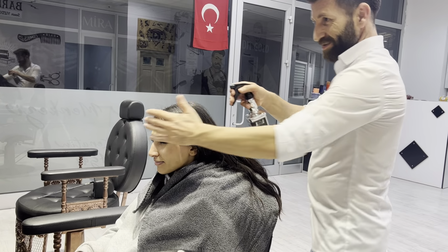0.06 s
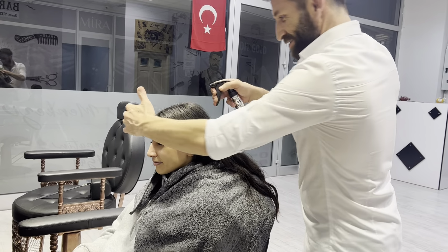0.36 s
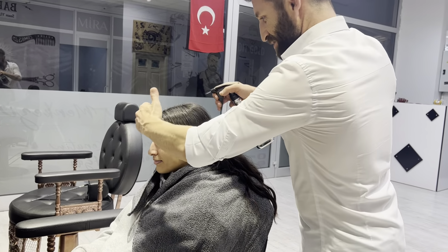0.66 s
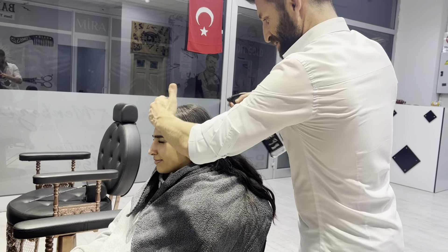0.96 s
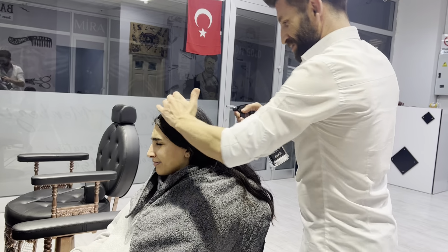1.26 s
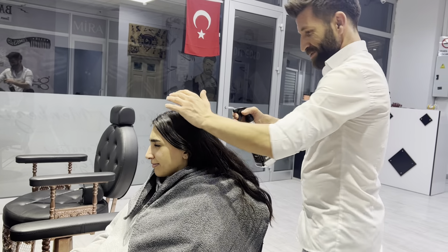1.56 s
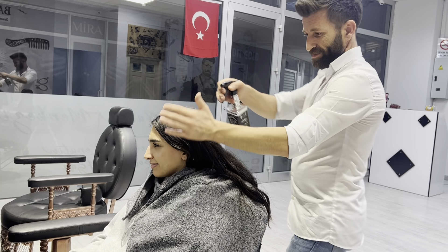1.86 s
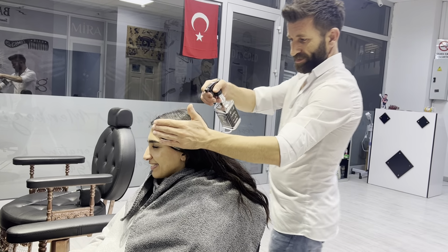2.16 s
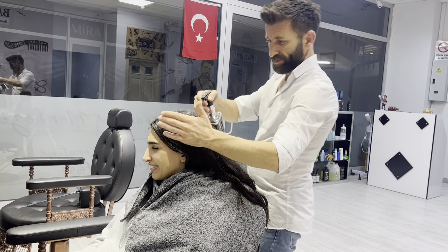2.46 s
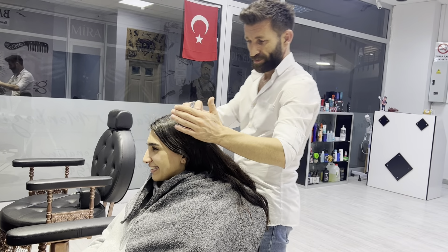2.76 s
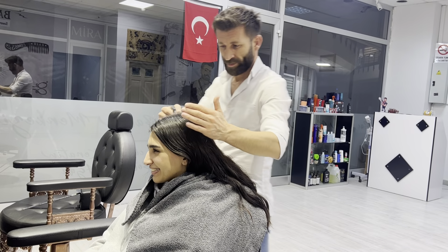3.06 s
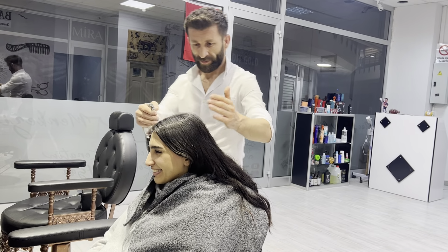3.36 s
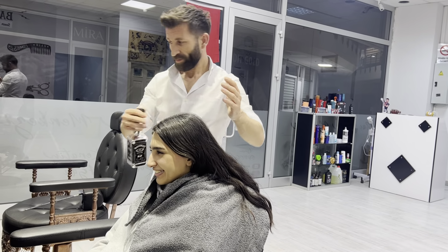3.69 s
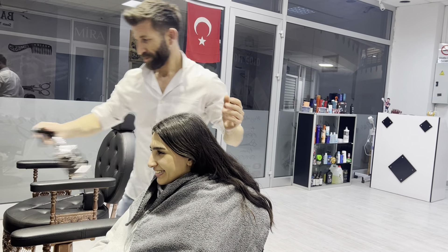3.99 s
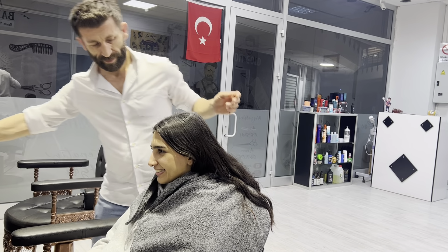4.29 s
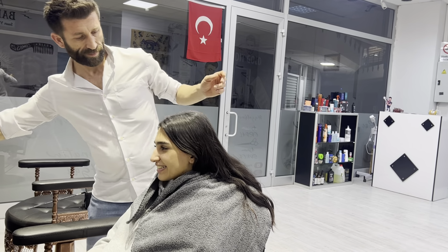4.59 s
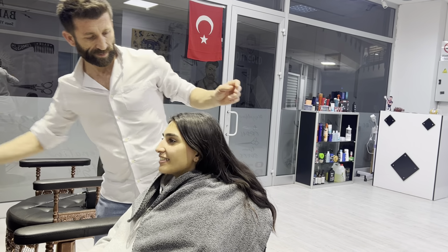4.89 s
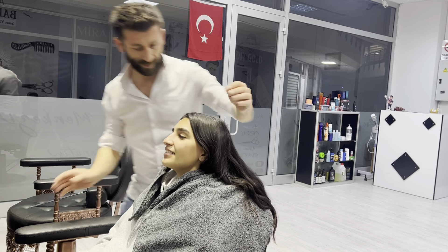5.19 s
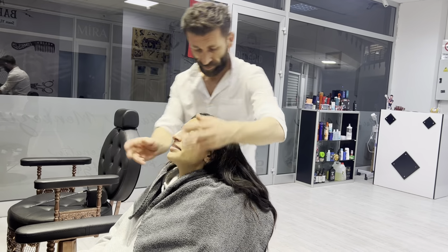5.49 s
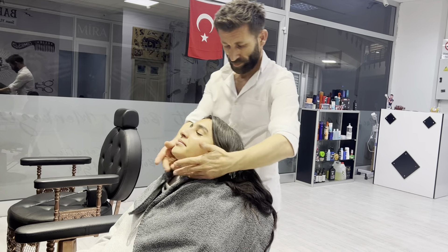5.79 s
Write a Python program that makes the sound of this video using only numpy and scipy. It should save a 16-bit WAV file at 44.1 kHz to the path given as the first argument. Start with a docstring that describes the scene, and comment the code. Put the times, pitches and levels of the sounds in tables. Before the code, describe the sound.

In a quiet, tiled barber's salon with a low hum, a trigger spray bottle is squeezed about a dozen times, each stroke a small plastic click and a faint hiss of mist. Twice, air spits more sharply from the nozzle. Clothes rustle and shoes tap softly nearby. Then the bottle lands on a hollow counter with one loud thump that booms briefly in the room.

```python
"""A trigger spray bottle mists hair in a tiled, humming barber's salon.
Stroke by stroke the plastic pump clacks and the jet hisses; twice air spits sharply through the nozzle.
Clothes rustle and shoes tap on the floor. Then one loud thump: the bottle lands on a hollow counter,
whose low modes boom on in the room."""
import sys
import numpy as np
from scipy import signal
from scipy.fft import rfft, irfft, next_fast_len
from scipy.io import wavfile
from scipy.ndimage import map_coordinates

SR = 44100
rng = np.random.default_rng(int(sys.argv[2]) if len(sys.argv) > 2 else 0)


def waveform_to_disk(signal):
    """Save audio, clipped to [-1, 1], as 16-bit WAV at the path in sys.argv[1]."""
    frames = np.transpose(np.atleast_2d(signal))
    scaled = np.clip(frames, -1, 1) * 32767
    samples = np.round(scaled).astype(np.int16)
    wavfile.write(sys.argv[1], SR, samples)


N = 257499
T = np.arange(SR) / SR  # 1 s event clock
SCENE_T = np.arange(N) / SR
SIDES = np.array([[0.5], [-0.5]])  # left, right share of a level or time offset

# trigger strokes: (time [s], nominal jet length [s], mist [dB], tick [dB], knock [dB])
SQUEEZES = [(.39, .18, -71.5, -79, -83), (0.632, 0.21, -71, -54, -63.5), (0.878, 0.21, -65.5, -54, -62.5),
            (1.127, 0.38, -69, -52, -58.5), (1.392, .14, -55, -72, -67), (2.06, 0.16, -66.5, -78, -72.5),
            (2.268, 0.19, -64.5, -50, -59.5), (2.495, 0.13, -63, -49.5, -57), (2.675, .11, -61, -49, -55.5),
            (2.843, 0.099, -62.5, -52.5, -55), (2.996, 0.052, -68.5, -55, -58.5),
            (3.148, 0.059, -63, -51, -58), (3.475, 0.081, -64.5, -52, -59)]


def amp(db):
    """Decibels to gain."""
    return 10 ** (np.asarray(db) / 20)


def along(points, hz):
    """Interpolate (frequency [Hz], value) points on a log axis."""
    knots_hz, values = np.transpose(points)
    return np.interp(np.log(hz + 1), np.log(knots_hz + 1), values)


def fade(t60_s, attack_s):
    """Exponential rise and decay, 1 s long."""
    return np.exp(-np.log(1000) * T / t60_s) * (1 - np.exp(-T / attack_s))


def burst(t60_s, attack_s):
    """White noise that rises and decays."""
    return rng.standard_normal(SR) * fade(t60_s, attack_s)


def arch(t, length):
    """Half sine: 0 to 1 and back within the length."""
    return np.abs(np.sin(np.pi * np.clip(t / length, 0, 1)))


def swells(rows):
    """Scene-long gain, one arch per (start [s], length [s], level [dB])."""
    return sum(amp(db) * arch(SCENE_T - start_s, length_s) for start_s, length_s, db in rows)


def wobble(rate_hz):
    """Smooth scene-long curve through random knots."""
    knots = rng.standard_normal(int(N * rate_hz / SR) + 4)
    return map_coordinates(knots, [np.arange(N) * rate_hz / SR])


def add(track, start_s, x):
    """Mix x into the track."""
    span = track[..., round(start_s * SR):][..., :x.shape[-1]]
    span += x[..., :span.shape[-1]]


def filtered(x, response):
    """Apply a complex response(hz)."""
    n = x.shape[-1]
    size = next_fast_len(n + SR // 4)
    return irfft(rfft(x, size) * response(np.fft.rfftfreq(size, 1 / SR)), size)[..., :n]


def coloured(x, spectrum, size=4096):
    """Minimum-phase filter of unit energy with the given spectrum."""
    gain = amp(along(spectrum, np.fft.rfftfreq(size, 1 / SR)))
    cepstrum = irfft(np.log(gain))
    cepstrum[1:size // 2] *= 2
    cepstrum[size // 2 + 1:] = 0
    kernel = irfft(np.exp(rfft(cepstrum)))
    return signal.fftconvolve(x, kernel / np.linalg.norm(kernel))[:len(x)]


def resonant(x, modes):
    """Resonator bank of unit power: (centre [Hz], width [Hz], gain [dB])."""
    def response(hz):
        bank = sum((-1) ** k * amp(db) * 1j * hz * width / (centre ** 2 - hz ** 2 + 1j * hz * width)
                   for k, (centre, width, db) in enumerate(modes))
        return bank / np.sqrt(np.mean(np.abs(bank) ** 2))
    return filtered(x, response)


def diffuse(pair):
    """Two independent signals to a sound field: alike in the bass, loose in the treble."""
    # left-right likeness: (frequency [Hz], correlation [-])
    likeness = [(50, 0.89), (130, 0.82), (260, 0.87), (520, 0.54), (1000, 0.41), (2000, 0.34),
                (12000, 0.093)]

    def weights(hz):
        angle = np.arccos(np.clip(along(likeness, hz), -1, 1)) / 2
        return np.array([np.cos(angle), np.sin(angle)])
    mid, side = filtered(pair, weights)
    return np.array([mid + side, mid - side])


def field(spectrum):
    """Diffuse stereo noise of rms 1 with the given spectrum."""
    noise = diffuse(filtered(rng.standard_normal((2, N)), lambda hz: amp(along(spectrum, hz))))
    return noise / np.sqrt(np.mean(noise ** 2) + 1e-20)


def in_salon(x, wet_db, left_db, lead_ms=0.021):
    """Place an event, left channel leading, with reverberation off tiles and glass."""
    # room decay: (frequency [Hz], t60 [s])
    decay = [(80, 0.71), (250, 0.6), (700, 0.42), (2000, 0.42), (4000, 0.54), (8000, 0.42), (15000, 0.097)]
    hz, t, bands = signal.stft(rng.standard_normal((2, SR * 3 // 4)), SR, nperseg=256)
    bands *= np.exp(-np.log(1000) * t / along(decay, hz)[:, None])
    tail = signal.istft(bands, SR, nperseg=256)[1]
    onset = 1 - np.exp(-T[:tail.shape[1]] / 0.00094)
    tail = diffuse(tail * onset)
    reverb = signal.fftconvolve(x[None], tail / np.linalg.norm(tail[0]), axes=1)[:, :SR]
    direct = filtered(x, lambda hz: np.exp(2j * np.pi * hz * SIDES * lead_ms / 1000))
    return (direct + amp(wet_db) * reverb) * amp(SIDES * left_db)


def background(hum_hz=100, hum_db=-62, sink_from_s=5.3, sink_db_per_s=17, hiss_rest_db=-99):
    """Room air, wavering mains hum, and two faint narrow bands of recorder hiss that swell twice."""
    # room air spectrum: (frequency [Hz], gain [dB])
    air_spectrum = [(18, -57), (30, -19), (45, 0.5), (60, -1.5), (80, -9.5), (110, 2), (140, -17.5),
                    (280, -20), (560, -31.5), (1100, -38), (1900, -35), (3400, -44), (8200, -40),
                    (11000, -43.5), (16000, -45.5)]
    # narrow bands of hiss: (centre [Hz], width [Hz], gain [dB])
    hiss_bands = [(2090, 290, -3), (4760, 450, 0.5)]
    # their swells: (start [s], length [s], level [dB])
    hiss_swells = [(1.66, 0.35, -81.5), (4.78, 0.41, -90.5)]
    sink_db = sink_db_per_s * np.maximum(SCENE_T - sink_from_s, 0)
    hum_gain = amp(hum_db - sink_db + 1.8 * wobble(5))
    hum = hum_gain * np.sin(2 * np.pi * hum_hz * SCENE_T + 0.39 * wobble(11))
    air = amp(-65 + 0.4 * wobble(3.32)) * field(air_spectrum)
    hiss_gain = amp(hiss_rest_db) + swells(hiss_swells)
    hiss = hiss_gain * resonant(rng.standard_normal((2, N)), hiss_bands)
    return (hum + air + hiss) * amp(SIDES)


def clothes(rest_db=-84):
    """With each movement cloth crumples in uneven dull patches and the sleeves swish."""
    # arm and body movements: (start [s], length [s], rustle [dB], swish [dB])
    moves = [(0.0, 0.34, -77.5, -79.5), (1.228, 0.47, -70, -90), (2.097, 1.0, -76, -97),
             (3.434, .34, -64.5, -79), (4.0, 0.21, -75.5, -91), (4.187, 0.071, -82, -72),
             (5.204, 0.15, -74.5, -77)]
    # crumpling cloth spectrum: (frequency [Hz], gain [dB])
    rustle_spectrum = [(100, 2), (220, -0.5), (500, -13), (1500, -21.5), (4000, -22), (8000, -34),
                       (16000, -59)]
    # sleeve spectrum: (frequency [Hz], gain [dB])
    sleeve_spectrum = [(300, -12), (1500, 2.5), (3400, -0.5), (6000, -9), (16000, -26)]
    crumple = amp(rest_db) + swells(move[:3] for move in moves)
    patches = amp(2.24 * wobble(14) + 3.4 * wobble(70))
    out = crumple * patches * field(rustle_spectrum) * amp(SIDES)
    for start_s, length_s, _, swish_db in moves:
        speed = arch(T, length_s) * amp(3.1 * wobble(27)[:SR])
        swish = amp(swish_db - 5) * speed * coloured(rng.standard_normal(SR), sleeve_spectrum)
        add(out, start_s, in_salon(swish, wet_db=-4.5, left_db=2.5))
    return out


def taps():
    """Soft dull contacts: a brief scuff and one heavily damped ring."""
    # shoe taps and handling knocks: (time [s], level [dB], ring [Hz])
    contacts = [(.117, -69, 698), (0.702, -56, 726), (1.293, -55.5, 700), (2.017, -63.5, 510),
                (2.133, -56.5, 580), (2.367, -61, 680), (2.393, -55, 690), (3.537, -51, 870),
                (3.543, -51, 1580), (3.698, -60.5, 550), (3.834, -69.5, 2760), (4.034, -57, 616),
                (5.407, -61, 750)]
    # sole spectrum: (frequency [Hz], gain [dB])
    sole_spectrum = [(60, -33), (200, 13), (600, 4), (1500, -10), (3000, -10), (8000, -76), (16000, -46.5)]
    out = np.zeros((2, N))
    for start_s, db, ring_hz in contacts:
        scuff = amp(0.5) * coloured(burst(0.044, attack_s=0.0006), sole_spectrum)
        ring = amp(9.5) * fade(0.014, attack_s=0.00046) * np.sin(2 * np.pi * ring_hz * T)
        add(out, start_s, in_salon(amp(db) * (scuff + ring), wet_db=-2, left_db=2, lead_ms=0.028))
    return out


def trigger(firm_edge_hz=15700, firm_db=-51, db_per_octave=5.5):
    """The trigger ticks on its stop, brighter when harder; the pump snaps, the hollow bottle knocks."""
    # clacks without a jet (trigger releases, steps or hand knocks): (time [s], tick [dB], knock [dB])
    clacks = [(1.117, -54, -58), (1.349, -54, -56), (1.588, -51, -57), (2.286, -55, -57.5),
              (3.639, -55.5, -70), (3.994, -58, -62.5), (5.208, -72, -65.5)]
    # tick spectrum: (frequency [Hz], gain [dB])
    tick_spectrum = [(500, -7), (2500, -18), (5000, -6), (8000, 4.5), (12000, 7), (16000, 2)]
    # pump housing resonances: (centre [Hz], width [Hz], gain [dB])
    pump_modes = [(812, 210, 3), (1475, 390, -0.5), (1880, 230, 2), (3000, 1050, -5)]
    # bottle modes: (frequency [Hz], gain [dB], t60 [s])
    bottle_modes = [(256, 0.5, 0.11), (342.7, -3.5, 0.1), (446.4, -1, 0.057), (655, -5.5, 0.045)]
    out = np.zeros((2, N))
    for start_s, *_, tick_db, knock_db in SQUEEZES + clacks:
        edge_hz = firm_edge_hz * 2 ** ((tick_db - firm_db) / db_per_octave)
        tick = coloured(burst(0.011, attack_s=0.00033), tick_spectrum)
        tick = filtered(tick, lambda hz: 1 / (1 + (hz / edge_hz) ** 4))
        snap = amp(knock_db + 1.1) * resonant(burst(0.04, attack_s=0.00087), pump_modes)
        knock = np.zeros(SR)
        for hz, db, t60_s in bottle_modes:
            detuned_hz = hz * rng.normal(1, 0.048)
            knock += amp(knock_db + db) * fade(t60_s, attack_s=0.0025) * np.sin(2 * np.pi * detuned_hz * T)
        add(out, start_s, in_salon(amp(tick_db + 6.5) * tick, wet_db=-0.5, left_db=0.6))
        add(out, start_s, in_salon(snap + knock, wet_db=0.6, left_db=0.9))
    return out


def mist(skew=0.76):
    """Pressure swells and falls with each squeeze; the jet sputters as it breaks into drops."""
    # jet spectrum: (frequency [Hz], gain [dB])
    jet_spectrum = [(300, -18), (700, -12), (1500, -2.5), (5000, -1), (8300, -1.5), (11500, -2.5),
                    (15300, -1), (16200, -6)]
    out = np.zeros((2, N))
    for start_s, length_s, db, _, _ in SQUEEZES:
        pressure = arch((T / length_s) ** skew, 0.97)  # skew < 1: early peak
        sputter = amp(3 * wobble(305.7)[:SR])
        jet = coloured(rng.standard_normal(SR) * sputter, jet_spectrum) * pressure
        add(out, start_s, in_salon(amp(db - 3.5) * jet, wet_db=1.5, left_db=1))
    return out


def spits(whistle_width_hz=220):
    """Air in the pump escapes at once: a short bright hiss that whistles in the nozzle."""
    # air puffs, in two clusters: (time [s], level [dB], t60 [s], whistle [Hz])
    puffs = [(1.147, -45.5, 0.24, 6150), (1.185, -55.5, 0.18, 4070), (3.329, -56, 0.19, 7300),
             (3.355, -39, 0.043, 8140), (3.362, -57, 0.11, 3740), (3.401, -59, 0.2, 5000)]
    # escaping air spectrum: (frequency [Hz], gain [dB])
    hiss_spectrum = [(1000, -21.5), (3000, -10), (4000, -8), (4800, -12), (6200, -5.5), (8300, 1),
                     (11500, -1), (15500, 6.5), (16500, -14.5)]
    out = np.zeros((2, N))
    for start_s, db, t60_s, hz in puffs:
        hiss = coloured(burst(t60_s, attack_s=0.00082), hiss_spectrum)
        whistle = amp(-7.5) * resonant(burst(t60_s, attack_s=0.001), [(hz, whistle_width_hz, 0)])
        add(out, start_s, in_salon(amp(db + 2) * (hiss + whistle), wet_db=-5, left_db=1.3))
    return out


def thump(boom_db=-24, attack_cycles=3.6, blur_rad_per_s=5, clink_hz=3100):
    """The bottle cracks onto a hollow counter; low modes build slowly and the room blurs their decay."""
    # bottle lands, rocks once: (time [s], crack [dB], clink [dB])
    impacts = [(4.494, -27, -36.5), (4.520, -40, -31.5)]
    # counter and low room modes: (frequency [Hz], gain [dB], t60 [s])
    counter_modes = [(42.7, -16.5, 1.2), (61.3, -19.5, 1.76), (84.3, -9, 0.87), (114.4, 6, 0.32),
                     (152.1, 0.5, 0.51), (199.5, -9.5, 0.65), (232, -8.5, 0.55), (279, -10, 0.634),
                     (361, -15.5, 0.53), (439.3, -15, 0.54), (559, -19, 0.36), (651, -22.5, 0.48),
                     (796, -21.5, 0.56), (1020, -25, .3), (1050, -11, 0.28), (1164, -27, 0.3),
                     (1225, -32, .3), (2030, -39, 0.59), (2370, -33, 0.45)]
    # impact spectrum: (frequency [Hz], gain [dB])
    crack_spectrum = [(70, -25), (170, -4.5), (300, -8), (420, -12.5), (700, -20.5), (880, -21.5),
                      (1080, -14.5), (1400, -29.5), (2050, -27), (2750, -34.5), (3150, -49.5), (3550, -43),
                      (5000, -42), (8000, -50), (16000, -50)]
    boom = np.zeros(SR)
    for k, (hz, db, t60_s) in enumerate(counter_modes):
        phase = 2 * np.pi * hz * T + blur_rad_per_s * T * wobble(24.8)[:SR]
        boom += (-1) ** k * amp(db) * fade(t60_s, attack_s=attack_cycles / hz) * np.sin(phase)
    out = np.zeros((2, N))
    boom_start_s = impacts[0][0] + 0.00314
    add(out, boom_start_s, in_salon(amp(boom_db) * boom, wet_db=-16.5, left_db=0, lead_ms=0.54))
    for start_s, crack_db, clink_db in impacts:
        crack = amp(crack_db + 5.5) * coloured(burst(0.053, attack_s=0.0028), crack_spectrum)
        clink = amp(clink_db) * fade(0.016, attack_s=0.001) * np.sin(2 * np.pi * clink_hz * T)
        add(out, start_s, in_salon(crack, wet_db=3.5, left_db=3, lead_ms=0.031))
        add(out, start_s, in_salon(clink, wet_db=-9.5, left_db=0))
    return out


def scene():
    """Stereo sum of all sources."""
    return mist() + spits() + trigger() + taps() + clothes() + thump() + background()


def record(dry, bottom_hz=33, top_hz=16100):
    """Microphone: deep bass cut, two narrow treble dips, hard band limit."""
    # response dips: (centre [Hz], width [Hz])
    dips = [(10200, 1320), (13850, 1200)]

    def response(hz):
        low_cut = (1j * hz) ** 2 / (bottom_hz ** 2 - hz ** 2 + 1j * hz * bottom_hz)
        notches = [1 - 0.95 * np.exp(-((hz - centre) / (width / 2)) ** 4) for centre, width in dips]
        return low_cut * np.prod(notches, axis=0) * (hz < top_hz)
    return filtered(dry, response)


dry = scene()
out = record(dry)
waveform_to_disk(out)
```